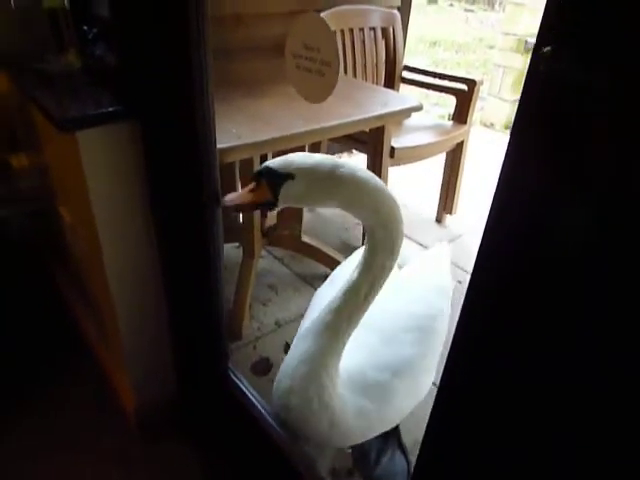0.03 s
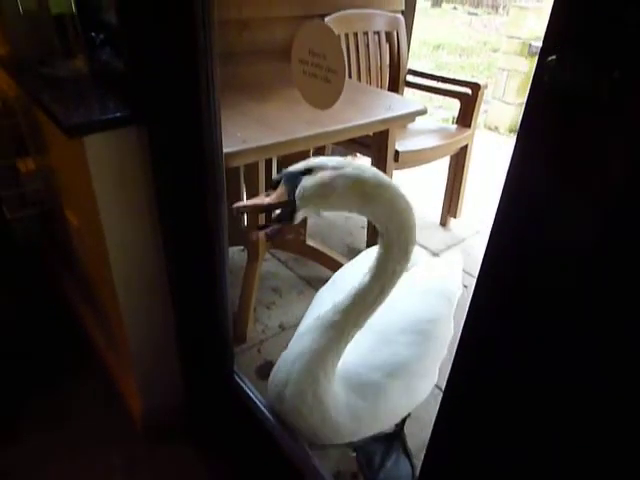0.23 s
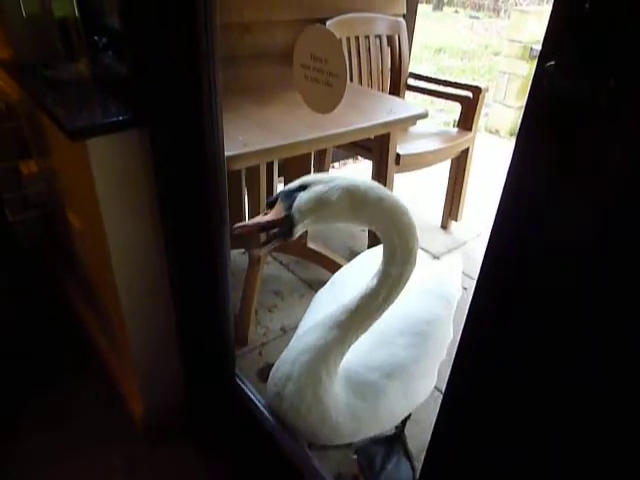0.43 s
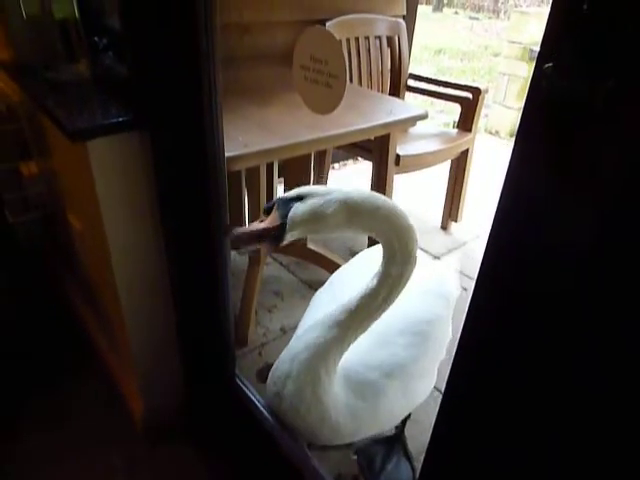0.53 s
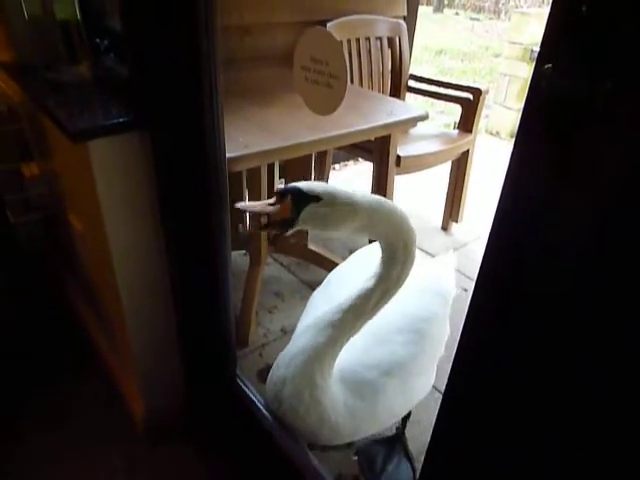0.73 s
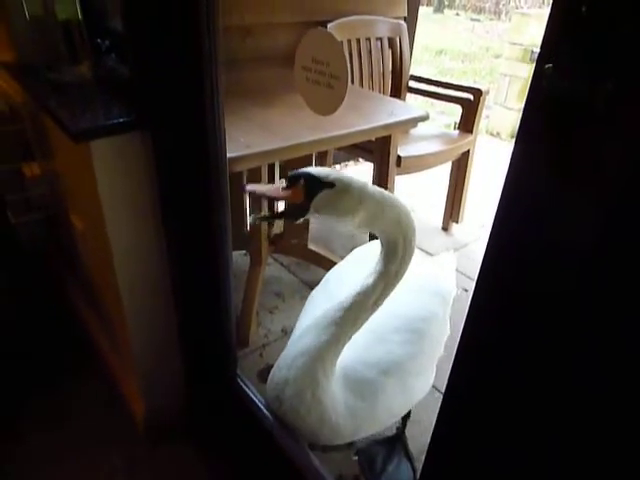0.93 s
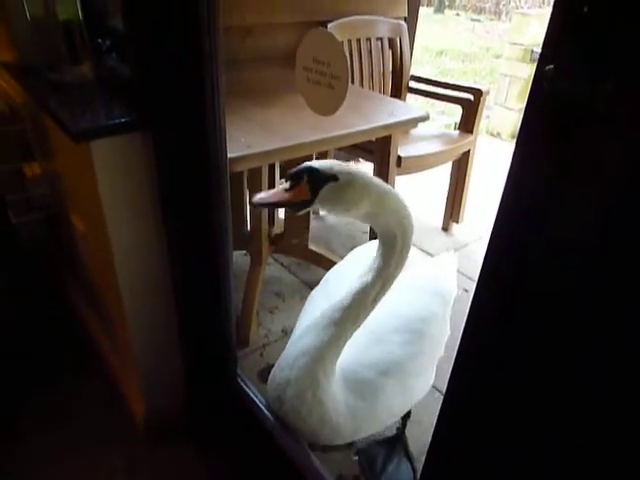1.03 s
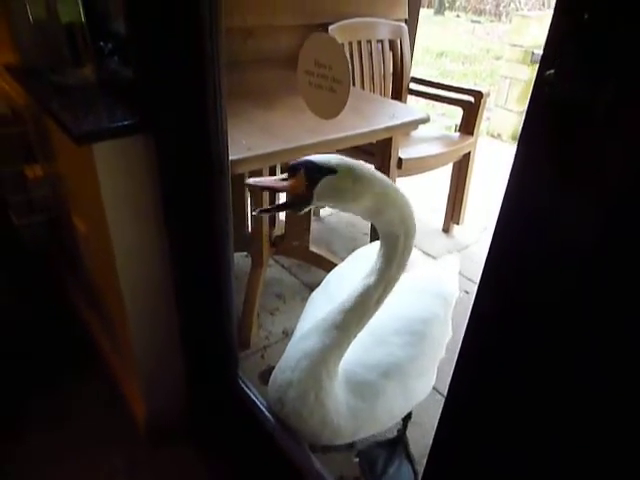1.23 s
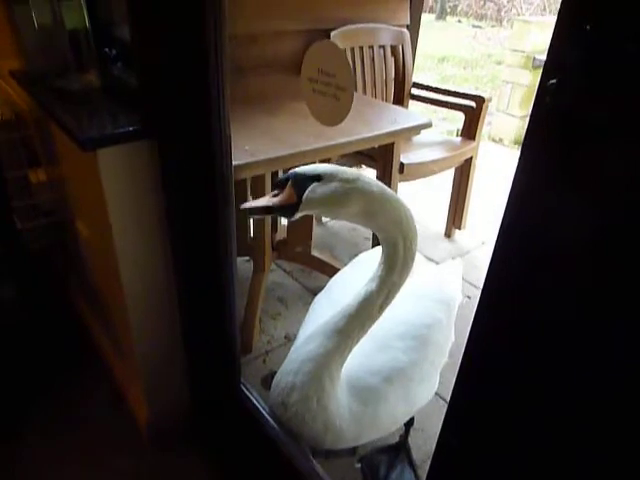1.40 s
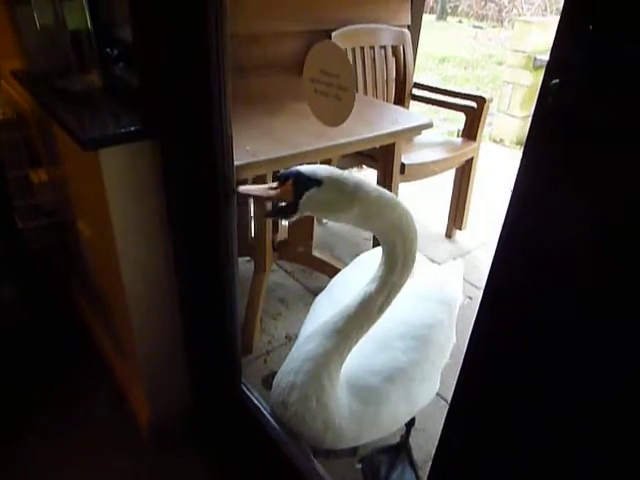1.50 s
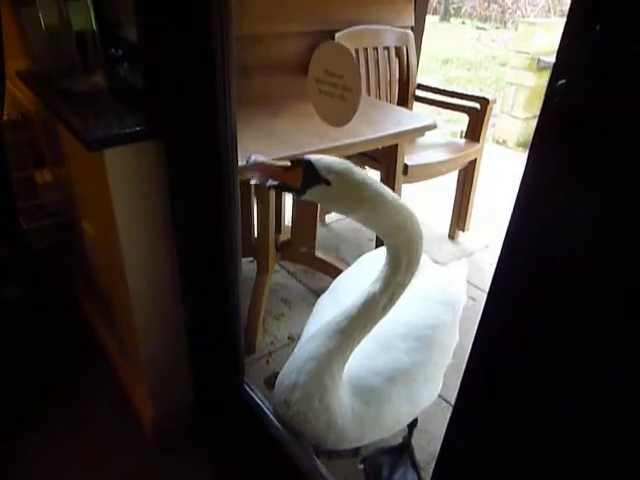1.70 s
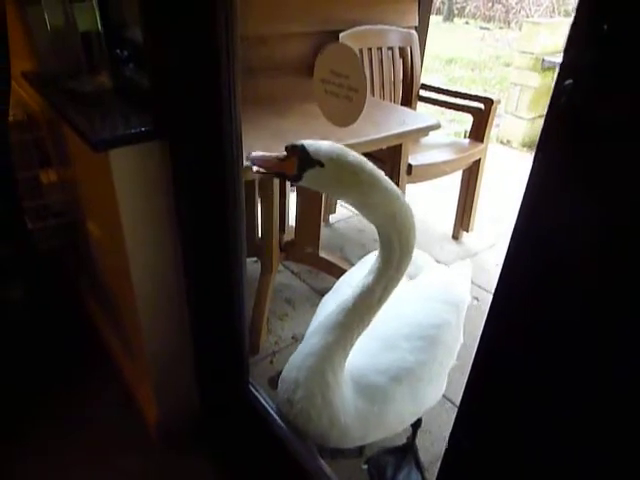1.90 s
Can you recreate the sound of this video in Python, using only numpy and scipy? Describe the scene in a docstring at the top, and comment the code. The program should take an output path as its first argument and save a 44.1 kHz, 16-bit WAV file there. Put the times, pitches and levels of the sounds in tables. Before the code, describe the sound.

A swan raps its bill on a glass door in a quick, uneven run. Each hard click has a short thud and a brief ring, with light ticks in between, heard from inside a quiet room.

```python
"""A swan raps its bill on a glass door, heard from inside a quiet room.
A faint steady hiss lies under the scene, which opens on the ring of a rap just struck.
Each rap begins with a hard click of horn on glass; the pane flexes with a short thud, recess and
walls reflect it, and the modes of pane and room ring on and decay. Between the raps and after
the last one, the edge of the bill ticks lightly on the glass."""
import sys
import numpy as np
from scipy import signal
from scipy.fft import rfft, irfft, next_fast_len
from scipy.io import wavfile

SR = 44100
rng = np.random.default_rng(int(sys.argv[2]) if len(sys.argv) > 2 else 0)


def pcm_store(signal):
    """Save signal as 16-bit PCM."""
    levels = np.round(np.clip(np.atleast_2d(signal), -1, 1) * 32767)
    wavfile.write(sys.argv[1], SR, levels.astype(np.int16).T)


N = 85995
T = np.arange(2 ** 15) / SR  # seconds within one blow
TOP_HZ = 8400
FLEX_LAG_S, FLEX_RISE_S = .0005, 0.00072  # the pane moves just after the click begins
# Spectrum of the bill's hard contact. Each row: frequency in Hz, relative level in dB.
CLICK_SPECTRUM = [(500, -9), (900, -3.5), (1150, 11), (1650, -2), (2050, 4), (3000, -2), (4500, 1.5),
                  (5500, -9.5), (6600, -4), (8300, -21)]


def undb(db):
    """Pressure amplitude grows tenfold with every 20 dB."""
    return 10 ** (np.asarray(db) / 20)


def fade(t60, rise_s):
    """Damped vibration: a quick rise, and an exponential decay of 60 dB in t60 seconds."""
    return (1 - np.exp(-T / rise_s)) * np.exp(-np.log(1000) * T / t60)


def delay(x, seconds):
    """Pure delay: the same waveform arrives later."""
    return np.interp(T - seconds, T, x, left=0)


def place(x, start_s):
    """A time shift sets one blow at its moment in the scene."""
    return np.interp(np.arange(N) / SR - start_s, T, x, left=0, right=0)


def colour(x, spectrum):
    """Minimum-phase filtering through (Hz, dB) points: no response precedes its cause."""
    hz, db = np.array(spectrum, float).T
    n = next_fast_len(len(x))
    bin_hz = np.arange(n + 1) * SR / (2 * n)
    gain = undb(np.interp(np.log(bin_hz + 1), np.log(hz), db))
    cepstrum = irfft(np.log(gain))
    cepstrum[1:n] *= 2  # fold onto positive time
    cepstrum[n + 1:] = 0
    return irfft(rfft(x, 2 * n) * np.exp(rfft(cepstrum)))[:len(x)]


def noise(spectrum, size):
    """Filtered white noise takes on the filter's spectrum; the rms is 1."""
    x = colour(rng.standard_normal(size), spectrum)
    return x / x.std()


def band_noise(low_hz, high_hz):
    """Band-limited noise has all its power between two frequencies; the rms is 1."""
    hz = np.fft.rfftfreq(len(T), 1 / SR)
    x = irfft(rfft(rng.standard_normal(len(T))) * ((hz >= low_hz) & (hz < high_hz)))
    return x / x.std()


def hiss():
    """Stationary noise: a faint background whose spectrum falls toward the treble."""
    # Each row: frequency in Hz, relative spectral density in dB.
    spectrum = [(15, -21.5), (28, 6), (60, -1), (140, -1.5), (200, 1), (320, -1), (470, -6.5), (700, -1.5),
                (1480, -5.5), (2780, -10), (4410, -12), (5360, -16.5), (7170, -13.5), (8300, -31.5),
                (10800, -60), (18300, -120)]
    return undb(-66.5) * noise(spectrum, N)


def click(spectrum, db, t60):
    """Modal overlap: dense, short-lived high modes of bill and glass merge into a noise burst."""
    return undb(db) * noise(spectrum + [(TOP_HZ * 2, -60)], len(T)) * fade(t60, rise_s=0.00058)


def crack():
    """Impulsive contact: horn meets glass and radiates one sharp pressure pulse."""
    pulse = colour(signal.unit_impulse(len(T)), CLICK_SPECTRUM)
    return -undb(-27) * delay(pulse, FLEX_LAG_S)


def thud(walls_db):
    """Early reflection: the pane's first flex returns, duller, from door recess and near walls."""
    # Wall echoes. Each row: delay in seconds, relative pressure gain.
    reflections = [(.009, 0.082), (0.0127, -1.2), (0.0409, -0.42)]
    flex_hz = 586
    direct = -undb(-16) * np.sin(2 * np.pi * flex_hz * T) * fade(t60=0.0048, rise_s=FLEX_RISE_S)
    recess = 0.51 * delay(direct, seconds=0.00301)
    walls = undb(walls_db) * sum(gain * delay(direct, lag_s) for lag_s, gain in reflections)
    lowpass = signal.butter(2, 1360, fs=SR, output="sos")
    return direct + signal.sosfiltfilt(lowpass, recess + walls)


def boom():
    """Heavily damped oscillation: the whole door gives briefly under the blow."""
    # Each row: frequency in Hz, level in dB, t60 in seconds.
    swings = [(166, -50.5, 0.15), (326, -31, 0.036)]
    return -sum(undb(db) * np.sin(2 * np.pi * hz * T) * fade(t60, FLEX_RISE_S) for hz, db, t60 in swings)


def ring(kind):
    """Modal superposition: the struck spot sets how strongly each mode of the pane sounds."""
    # The leading tap of a pair, the following tap and a square blow land on different spots.
    kinds = ["lead", "follow", "square"]
    # The pane in its room. Each row: frequency in Hz, t60 in seconds, relative dB for each kind of blow.
    modes = [(72.5, .3, -18, -13.5, -11), (101.3, 0.41, -10, -13, -12.5),
             (157.4, 0.41, -16.5, -11.5, -15.5), (177.6, .27, -8.5, -7.5, -8.5),
             (252.5, .42, -6, -10, -3.5), (278, .55, -18, -7, -8), (311.1, 0.42, -3, 1.5, -2),
             (350, 0.18, -5, -10.5, -6.5), (408.3, 0.51, -4, -8, -1.5), (440.4, 0.5, -2, -1, -2),
             (522.3, 0.36, -9.5, -8.5, -5), (575, 0.35, -14.5, -7, -12), (601.7, 0.25, -1, -1.5, -5.5),
             (637, 0.34, -12.5, -5, -10), (684.7, 0.29, -7.5, -5, -10.5), (692, 0.19, -19, 0.5, -6),
             (749.3, 0.15, -4, -7.5, -0.5), (866, 0.32, -20, -12, -16), (932, 0.26, -18.5, -15, -20),
             (994, 0.16, -7, -7.5, -9.5), (1050, 0.64, -17.5, -19, -29.5)]
    spot = kinds.index(kind)
    pane = 0
    for k, (hz, t60, *spot_db) in enumerate(modes):
        amplitude = (-1) ** k * undb(spot_db[spot])  # neighbouring modes swing in opposite directions
        pane += amplitude * np.sin(2 * np.pi * hz * T) * fade(t60, rise_s=0.00075)
    return undb(-38) * pane


def room():
    """Reverberation: a diffuse field decays at its own rate in each half-octave band."""
    # Each row: frequency in Hz, band level in dB, t60 in seconds.
    decay_curve = [(41.6, -71, 0.97), (85, -64.5, 1), (166, -53.5, 0.74), (318, -46, 0.46), (627, -42, 0.5),
                   (796, -56, 0.44), (1200, -50.5, 0.26), (2580, -65.5, 0.46), (5150, -68, 0.82),
                   (8040, -84, 1)]
    hz, levels_db, t60s = np.array(decay_curve).T
    quarter_octave = 2 ** .25
    tail = 0
    for centre_hz in 32 * 2 ** np.arange(0, 8.1, .5):
        db = np.interp(np.log(centre_hz), np.log(hz), levels_db)
        t60 = np.interp(np.log(centre_hz), np.log(hz), t60s)
        band = band_noise(centre_hz / quarter_octave, centre_hz * quarter_octave)
        tail += undb(db) * band * fade(t60, rise_s=0.00096)
    return tail


def raps():
    """Impact excitation: each blow sounds the same door, coloured and damped by how the bill lands."""
    # Each row: start in seconds, kind of blow, gains in dB of the whole rap, its ring and its wall
    # echoes, damping by the bill in dB per second, then gains in dB of every band below but body.
    blows = [(-.16, "lead", -5, -8, 8, 15.5, 13.5, 12.5, -11, -6, -5, -18),
             (0.0405, "lead", -12, -5.5, -3, 10, 4, 1.5, -2.5, -6.5, -24, -7.5),
             (0.2063, "lead", -2.5, -3, -12, 24, 2, 0.5, 1, 4.5, 4.5, 0),
             (0.2638, "follow", -4, 0.5, -10, 38.5, -5.5, -1.5, 4, 4, 2.5, 0),
             (0.4429, "lead", -6, -2.5, -2.5, 22, 3.5, 2, -0.5, 1, 2, -2.5),
             (0.5075, "lead", -6.5, -5.5, -12.5, 52.5, -3, 1.5, 1.5, 8.5, 2.5, 6.5),
             (0.5121, "follow", -3.5, -3.5, -9, 33, -6, 4.5, 1, 3, -1, -11.5),
             (0.7014, "lead", -7.5, -6, -8.5, 19, 7, 5, 0.5, 3.5, 2, 6),
             (0.7469, "follow", -14.5, -1, -13.5, 35, -2.5, 2.5, 4.5, 4.5, 1.5, -5.5),
             (0.9583, "square", 3.5, -3.5, -14.5, 8.5, -6, -5, 1, -0.5, -1, -7.5),
             (1.0923, "lead", -15.5, -4.5, -2, -7, 10, 6, 1, 1, 3.5, 1),
             (1.312, "square", 2, -3, -6, 5, 0, -3, 1.5, -1, -1, -4),
             (1.4378, "lead", -14, -8.5, -1, -2, 0.5, 3, -4, 6, 3.5, 3),
             (1.4763, "lead", -8, -7.5, -9, 17, 6, 1.5, 4, -2.5, -0.5, 7)]
    # Centres in Hz of the boom, hollow, body, knock, clack, click and snap bands.
    bands_hz = [150, 300, 430, 680, 1200, 3300, 7000]
    rapping = 0
    for start_s, kind, db, ring_db, walls_db, damping, boom_db, hollow_db, *upper_db in blows:
        contact = list(zip(bands_hz, (boom_db, hollow_db, 0, *upper_db)))
        bill = crack() + click(CLICK_SPECTRUM, db=-40.5, t60=0.043)
        ringing = undb(ring_db - damping * T) * (ring(kind) + room())
        door = delay(thud(walls_db) + boom() + ringing, FLEX_LAG_S)
        rapping += undb(db) * place(colour(bill + door, contact), start_s - FLEX_LAG_S)
    highpass = signal.butter(3, 72.5, "high", fs=SR, output="sos")  # the raps carry no deep bass
    return signal.sosfilt(highpass, rapping)


def ticks():
    """Grazing contact: the bill's edge excites brief high modes, too lightly to flex the pane."""
    # Each row: start in seconds, relative level in dB.
    touches = [(0.08, -20), (0.1755, -21), (1.3758, -12), (1.532, -12), (1.581, -17.5), (1.844, -15.5)]
    # Each row: frequency in Hz, relative level in dB.
    spectrum = [(500, -1), (1400, -6), (2000, 4.5), (2600, 0.5), (3200, -11), (4500, -8), (6600, -11),
                (8300, -22)]
    return sum(undb(db) * place(click(spectrum, db=-38, t60=0.027), start_s) for start_s, db in touches)


def scene():
    """Superposition: hiss, raps and ticks add in one channel."""
    return (hiss() + raps() + ticks())[None]


def record(dry):
    """Band limiting: a steep low-pass filter removes the highest treble."""
    return signal.sosfilt(signal.ellip(8, .2, 70, TOP_HZ, fs=SR, output="sos"), dry)


dry = scene()
out = record(dry)
pcm_store(out)
```